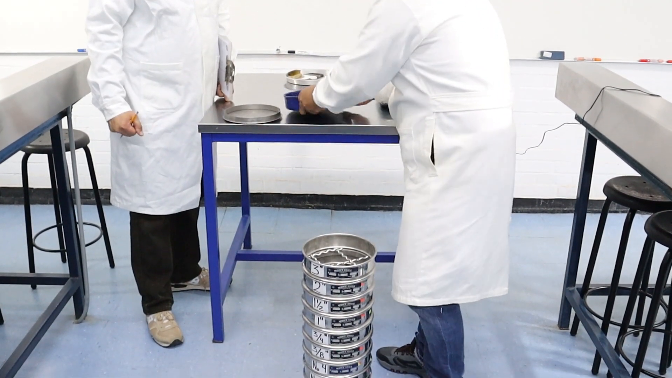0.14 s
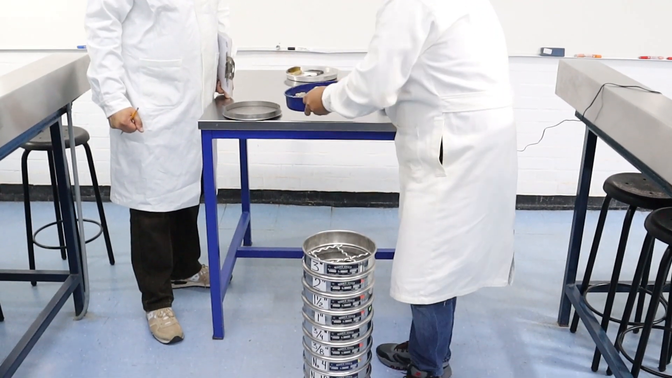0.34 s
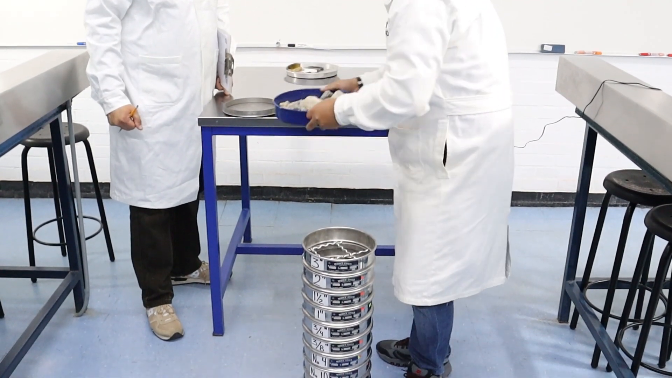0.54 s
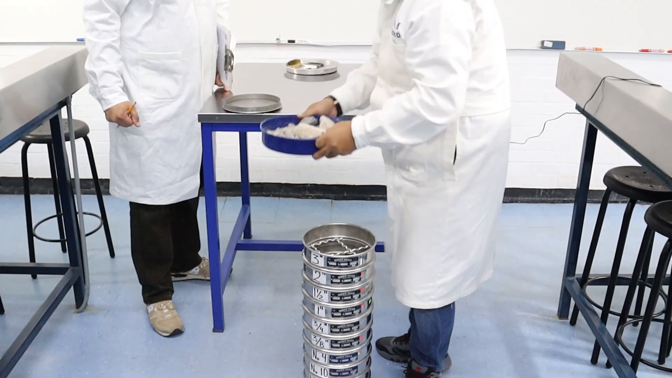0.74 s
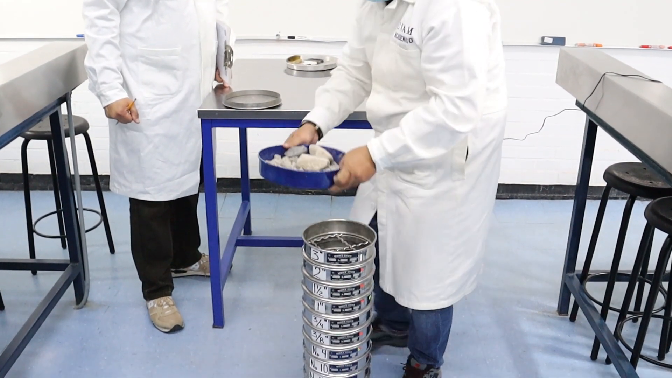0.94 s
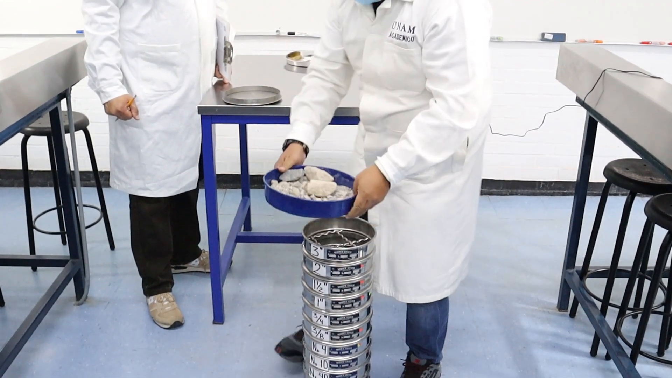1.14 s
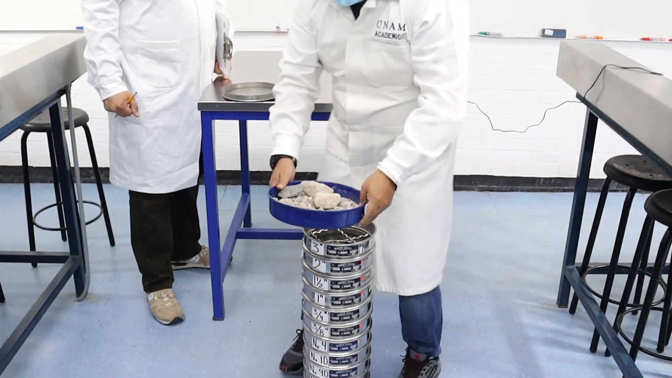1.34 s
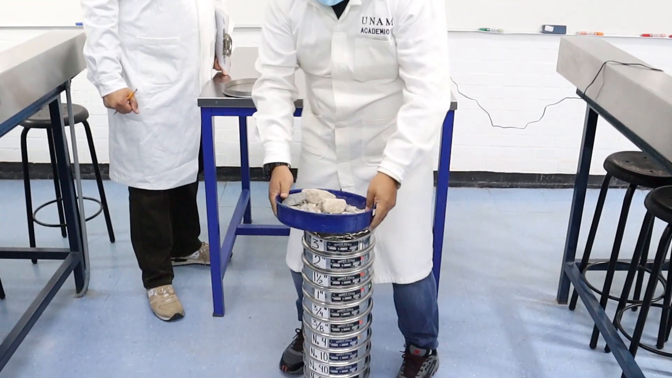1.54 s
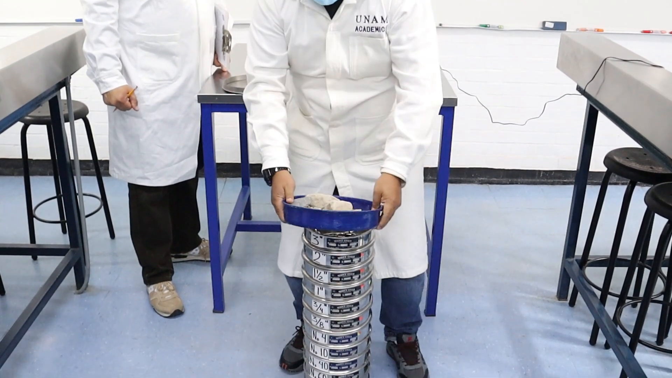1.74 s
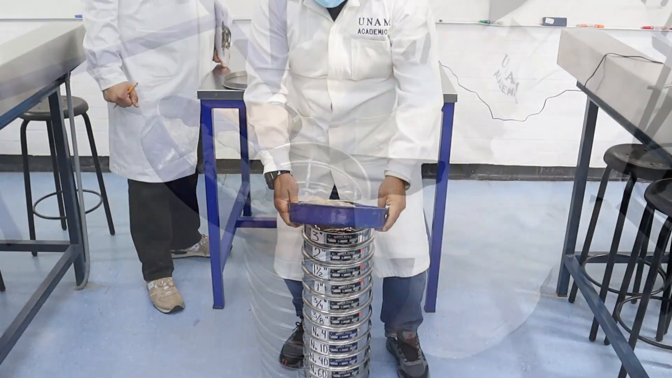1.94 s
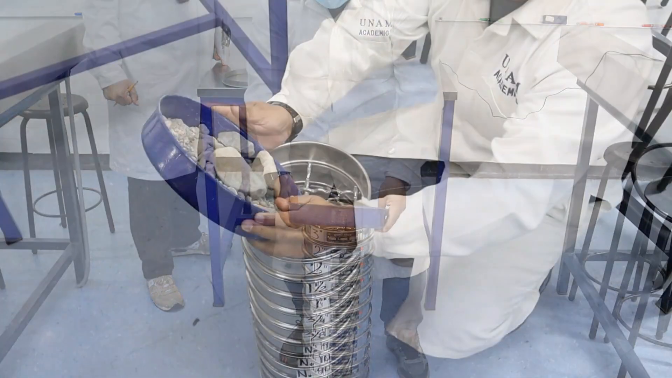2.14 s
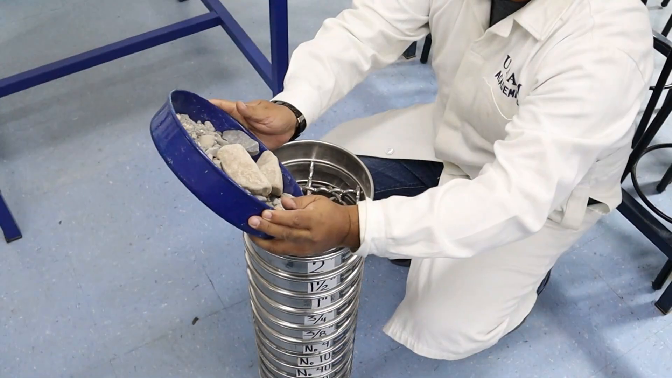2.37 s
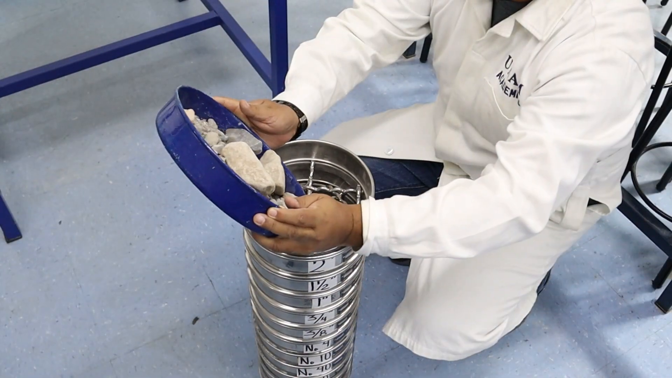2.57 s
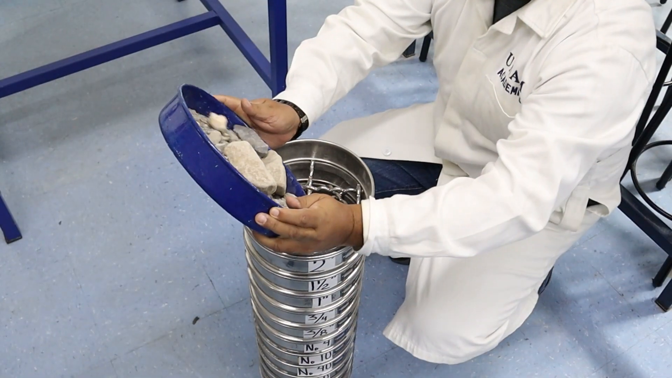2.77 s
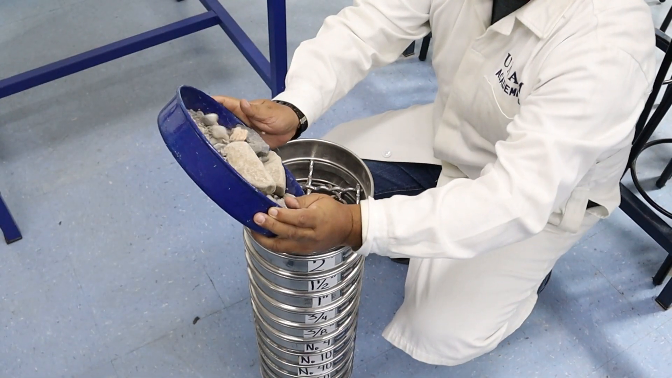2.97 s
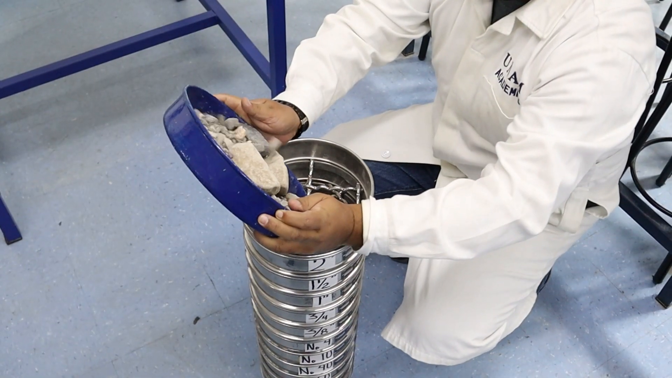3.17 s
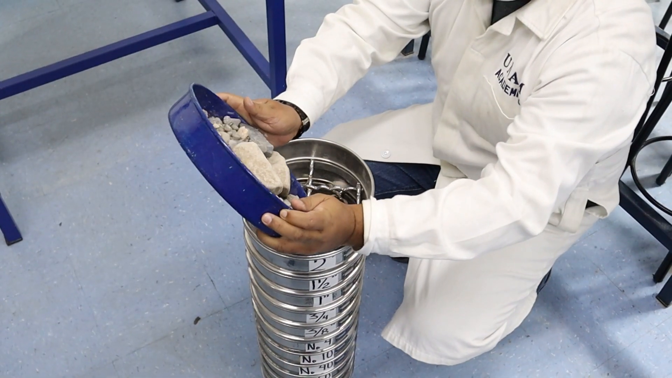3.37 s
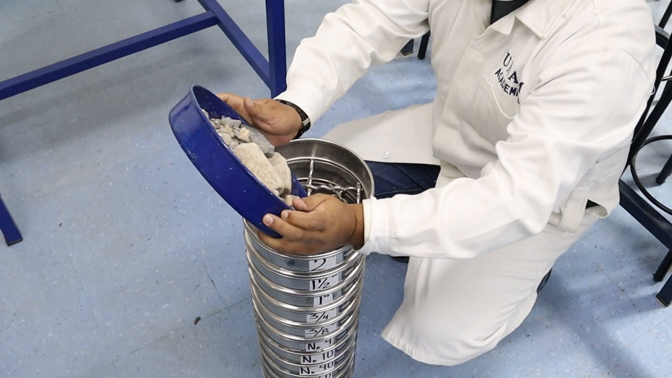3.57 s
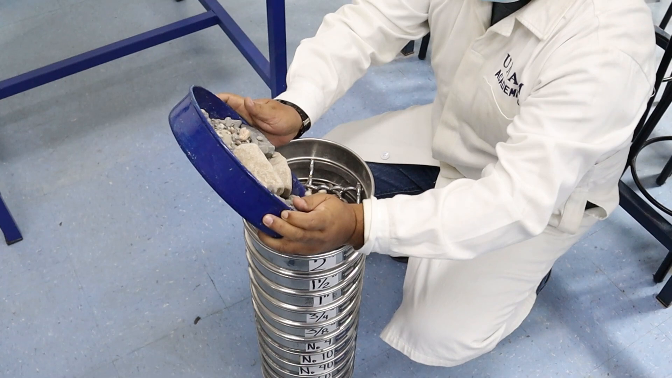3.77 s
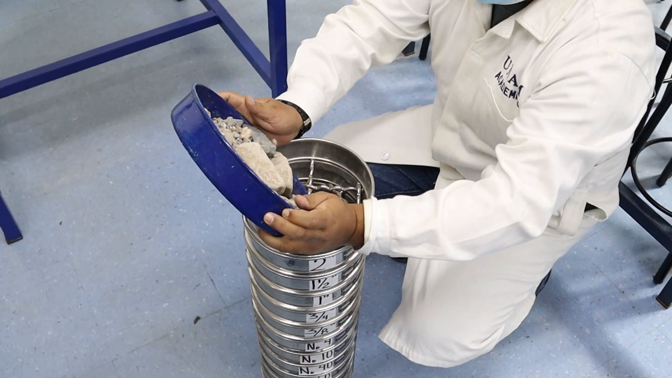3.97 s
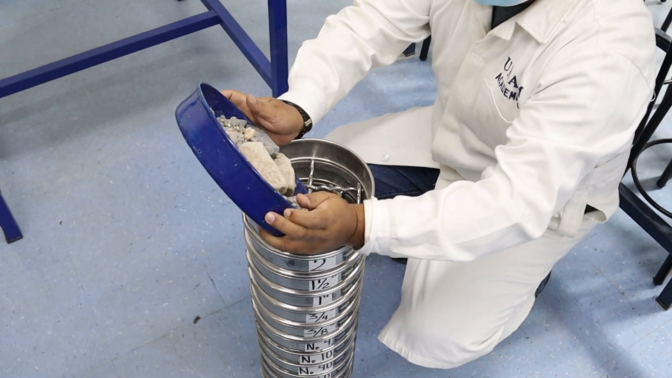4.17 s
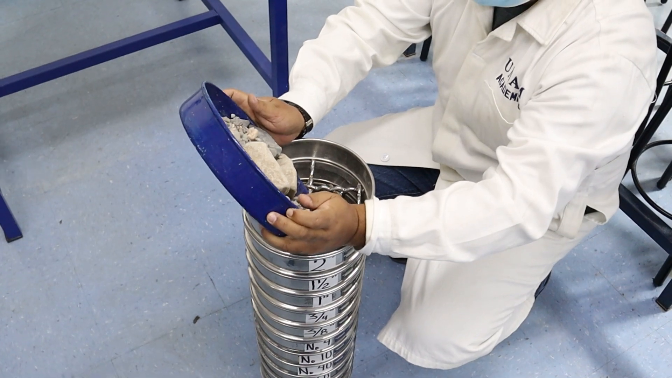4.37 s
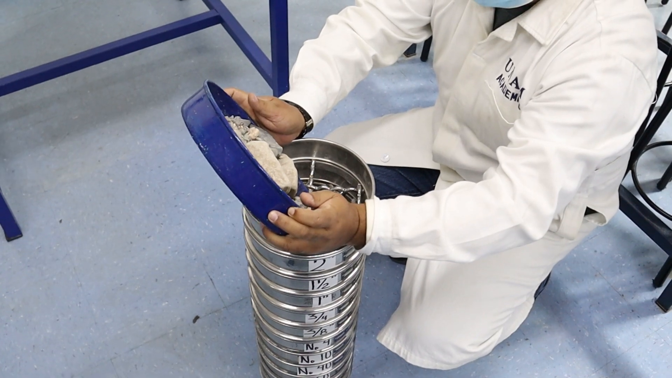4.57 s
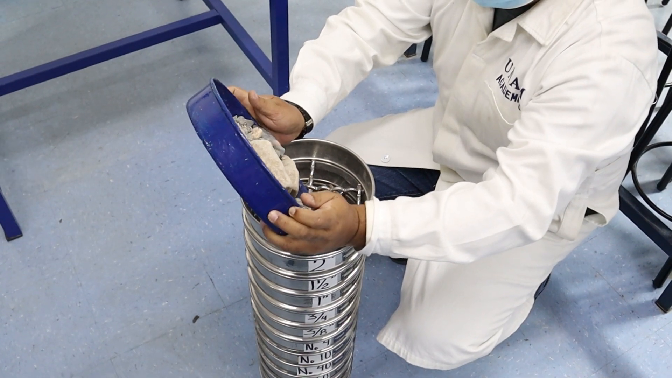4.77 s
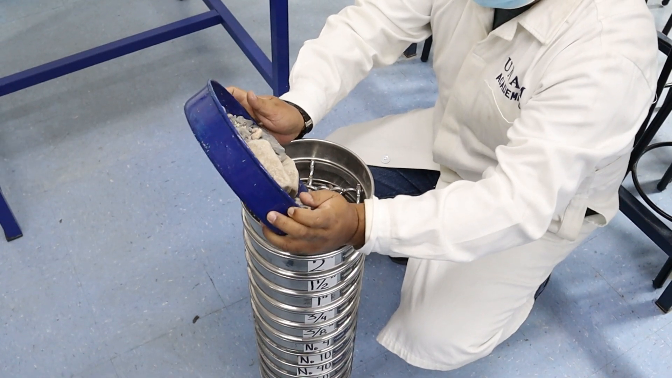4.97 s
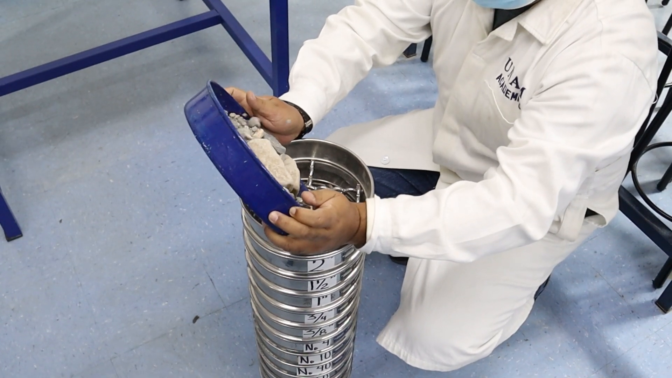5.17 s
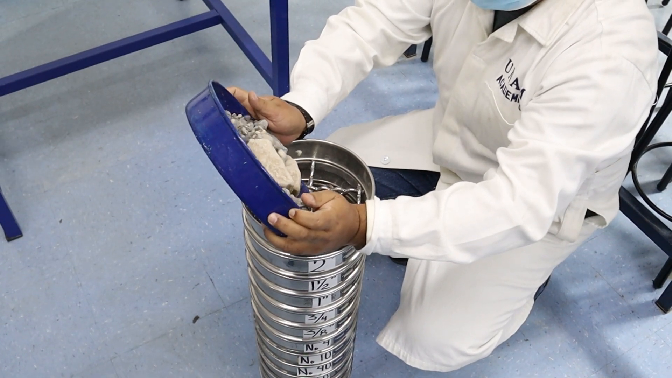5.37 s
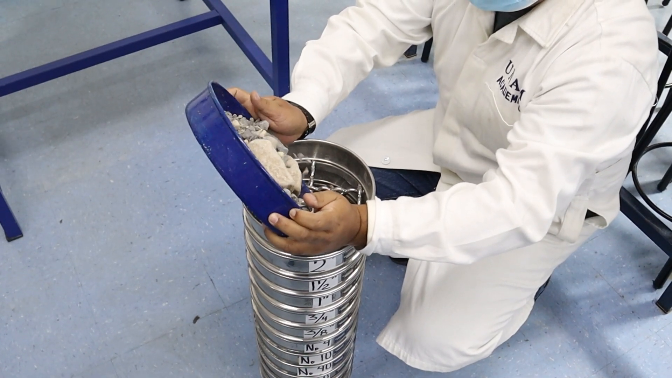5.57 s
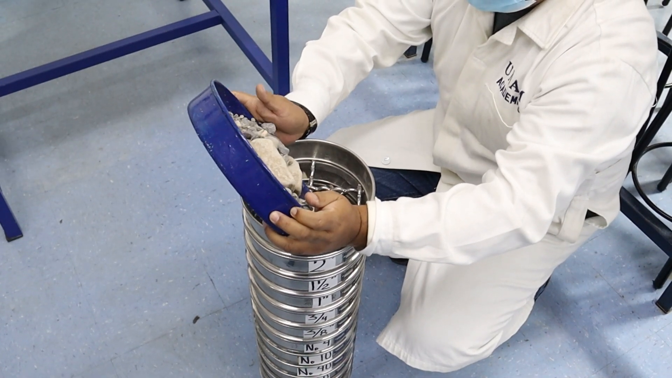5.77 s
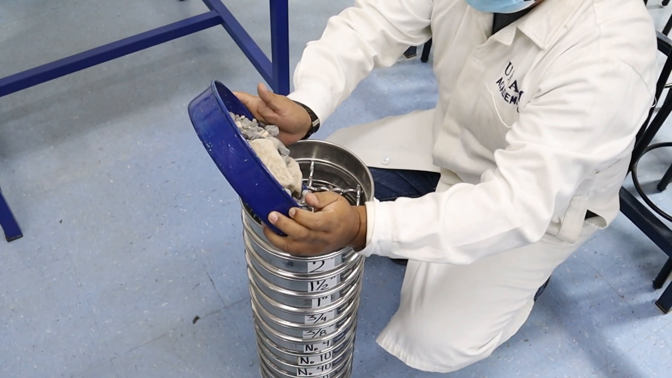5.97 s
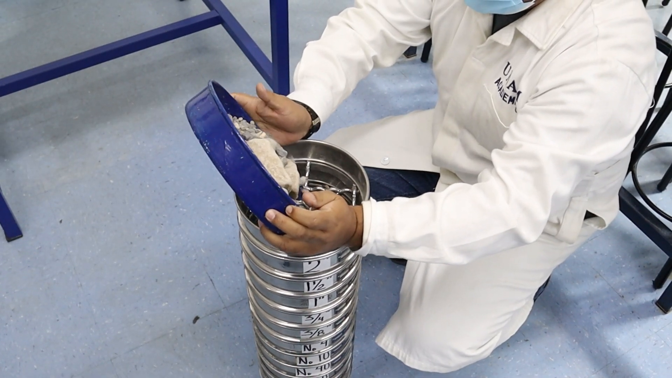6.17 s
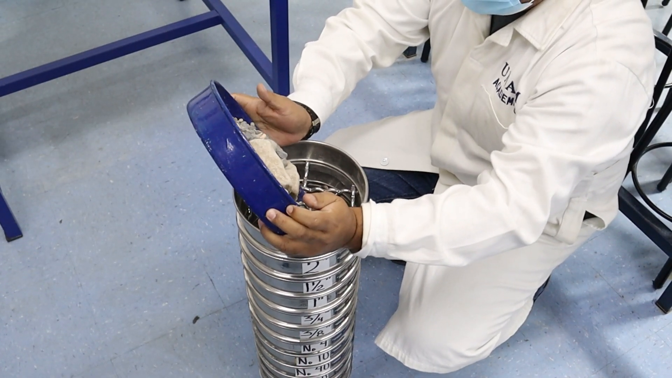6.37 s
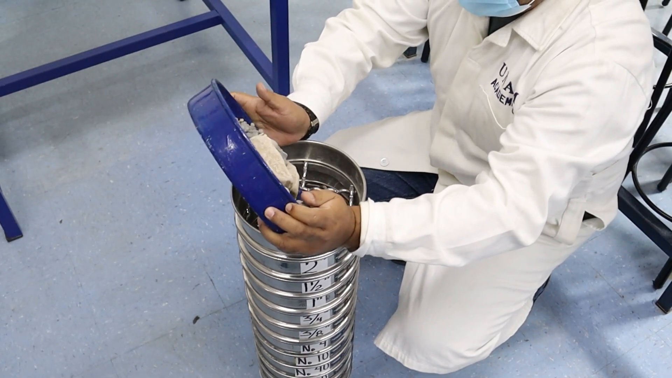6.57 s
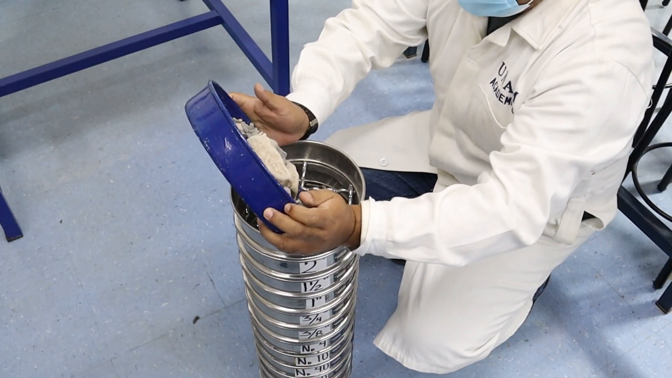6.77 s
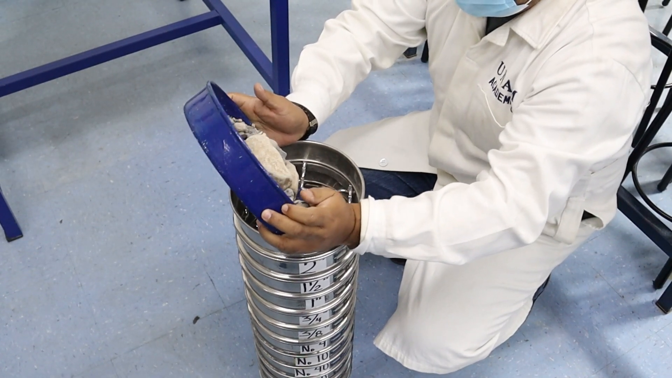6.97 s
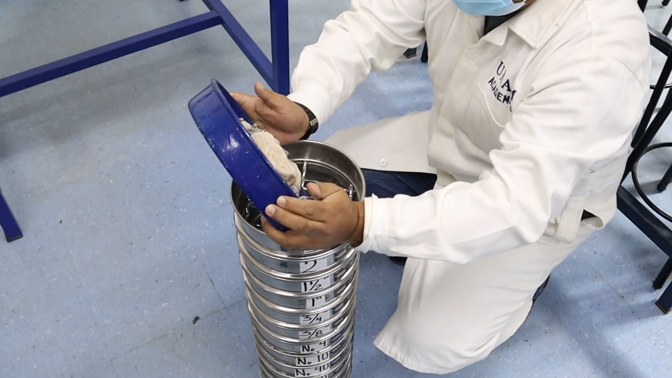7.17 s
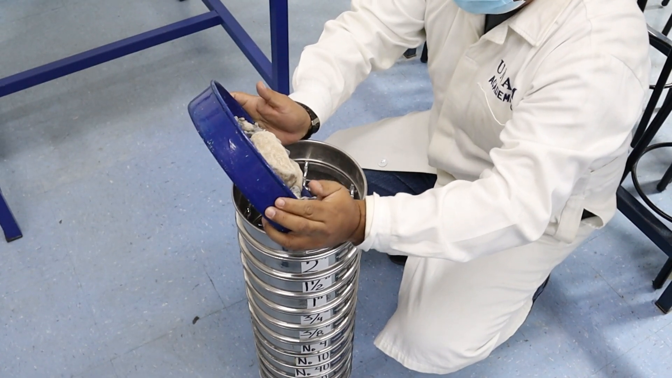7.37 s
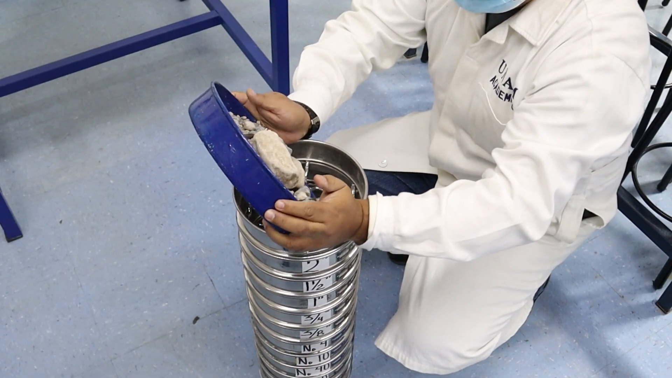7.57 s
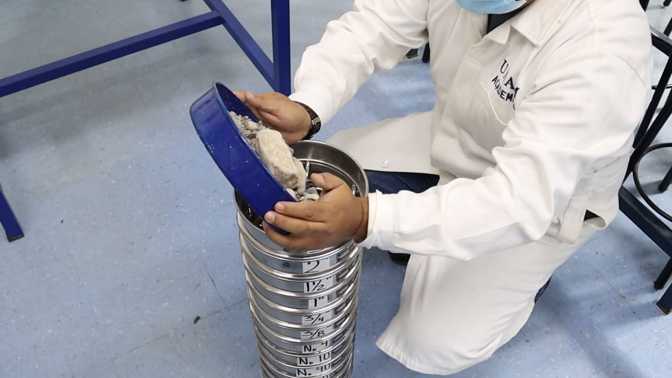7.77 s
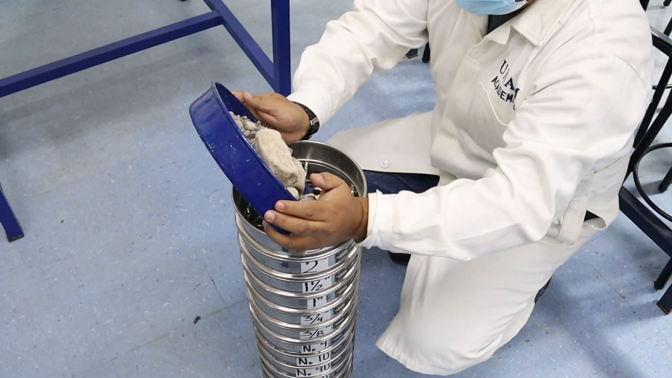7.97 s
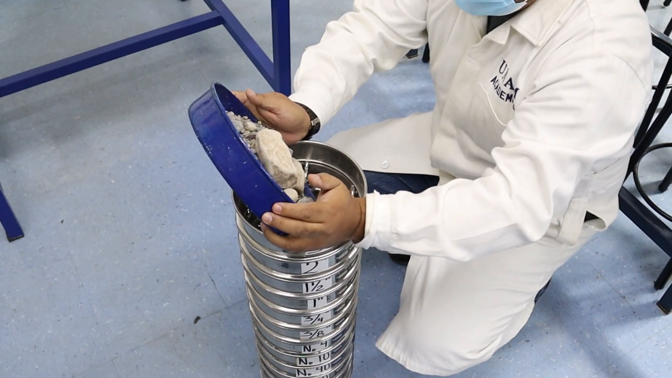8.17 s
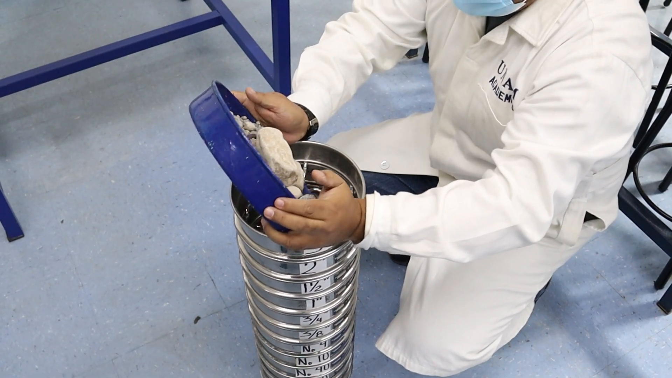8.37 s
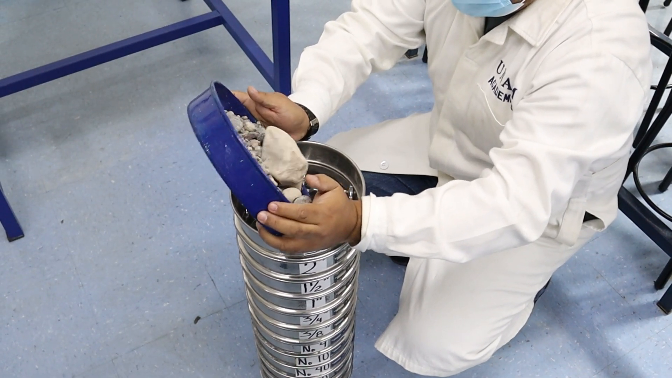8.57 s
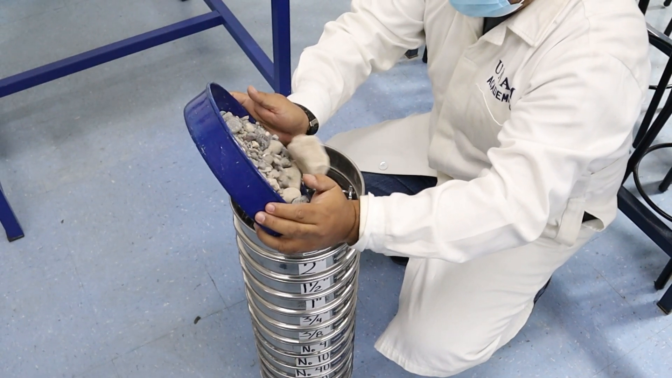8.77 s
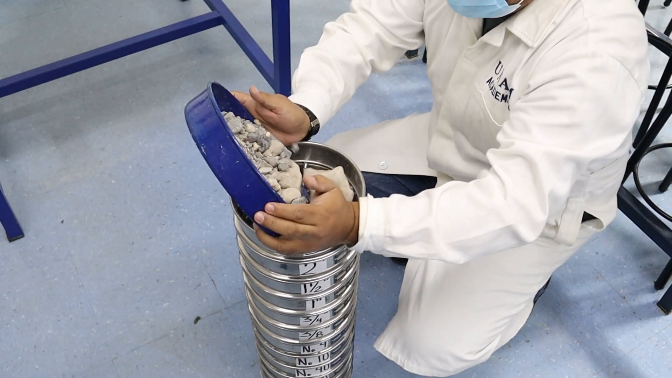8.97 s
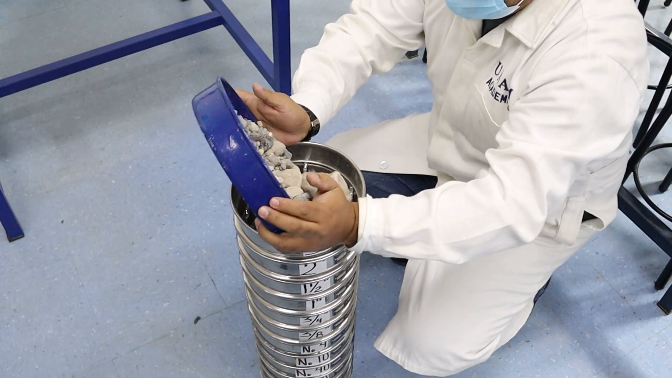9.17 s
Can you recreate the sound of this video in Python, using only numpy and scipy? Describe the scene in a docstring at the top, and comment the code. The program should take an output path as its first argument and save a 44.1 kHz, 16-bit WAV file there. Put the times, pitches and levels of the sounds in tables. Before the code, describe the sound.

Faint tray clang and shoe scuffs in a hard lab, brief silence, then close gravel cracking, sliding and hissing over steel sieve mesh, ending with a heavy stone.

```python
"""A hard-walled lab with a tall stack of steel sieves, into which a tray of gravel and sand is tipped.
Far off, a tray clang (ringing modes driven by dying noise) fades, shoes scuff (swelling filtered noise)
and small taps ring. The sound drops out briefly. Then, close up, the tray knocks the top rim, stones
crack on the wires (noise bursts and dying sines), gravel slides and sand hisses (noise that follows one
stream level), and lumps set the air column booming (resonant noise) until the largest stone lands."""
import sys
import numpy as np
from scipy import signal
from scipy.io import wavfile

SR = 44100
rng = np.random.default_rng(int(sys.argv[2]) if len(sys.argv) > 2 else 0)


def wrap_up_sound(samples):
    """Save the sound to the file named by the first command line argument, as 16-bit audio."""
    columns = np.atleast_2d(samples).T
    # keep every value between -1 and 1, then stretch to whole-number steps
    tamed = np.clip(columns, -1, 1)
    steps = np.round(tamed * 32767).astype(np.int16)
    wavfile.write(sys.argv[1], SR, steps)


N = 407043
STEP = 32   # samples per step of slow envelopes
SILENCE_START_S, SILENCE_END_S = 2.148, 2.178   # far sounds before it, close ones after


def from_db(db):
    """Decibels to gain."""
    return 10 ** (np.asarray(db) / 20)


def rms_one(x):
    """Scale to unit rms."""
    return x / np.sqrt(np.mean(x ** 2) + 1e-20)


def at_hz(points, hz):
    """Read a table on a log-frequency axis."""
    table_hz, values = np.transpose(points)
    return np.interp(np.log(hz), np.log(table_hz), values)


def band(x, low_hz, high_hz):
    """Butterworth band-pass."""
    sos = signal.butter(2, [low_hz, high_hz], "band", fs=SR, output="sos")
    return signal.sosfilt(sos, x)


def fade(clicks, t60):
    """Each click starts an envelope that dies exponentially."""
    return signal.lfilter([1], [1, -from_db(-60 / (t60 * SR))], clicks + 1e-18)


def ring(clicks, hz, t60):
    """A damped resonator: a unit click sets a sine of about height 1 ringing."""
    radius = from_db(-60 / (t60 * SR))
    angle = 2 * np.pi * hz / SR
    return signal.lfilter([0, np.sin(angle)], [1, -2 * radius * np.cos(angle), radius ** 2], clicks + 1e-18)


def pings(times, sizes, hz, t60):
    """Dying sines, each with its own time, size and pitch."""
    n = np.arange(int(.6 * t60 * SR))
    sines = np.sin(2 * np.pi / SR * hz[:, None] * n)
    waves = sizes[:, None] * from_db(-60 * n / (t60 * SR)) * sines
    at = (times * SR).astype(int)[:, None] + n
    return np.bincount(at.ravel(), waves.ravel(), N + len(n))[:N]


def placed(times, sizes):
    """Clicks of given sizes at given times."""
    clicks = np.zeros(N)
    np.add.at(clicks, np.round(np.asarray(times) * SR).astype(int), sizes)
    return clicks


def per_sample(slow):
    """A slow envelope read at every sample."""
    return np.interp(np.arange(N) / STEP, np.arange(len(slow)), slow)


def swell(start_s, rise_s, t60, hold_s=0, sag_db=0):
    """Slow envelope: rise, hold with a sag in dB per s, exponential release."""
    t = np.arange(0, N + STEP, STEP) / SR - start_s
    held = np.clip(t, 0, hold_s)
    released = np.maximum(t - hold_s - rise_s, 0)
    return np.clip(t / rise_s, 0, 1) * from_db(-sag_db * held - 60 * released / t60)


def coloured(spectrum, low_hz, octaves):
    """Steady noise in third-octave bands after a spectrum, up to the end of the silence; rms 1."""
    length = int(SILENCE_END_S * SR)
    white = rng.standard_normal((2, length))
    edges = low_hz * 2 ** np.arange(0, octaves, 1 / 3)
    noise = np.zeros(length)
    for k, (low, high) in enumerate(zip(edges, edges[1:])):
        noise += from_db(at_hz(spectrum, np.sqrt(low * high))) * band(white[k % 2], low, high)
    return np.pad(rms_one(noise), (0, N - length))


# reverberation time of the hard-walled lab: (frequency [Hz], t60 [s])
LAB_DECAY = [(300, 1), (2000, 1), (6000, 0.31), (15000, 0.29)]


def lab(x):
    """Reverberation: half-octave noise bands that each die at their own rate, after a short gap."""
    t = np.arange(SR) / SR
    edges = 250 * 2 ** np.arange(0, 6.5, .5)
    tail = np.zeros(SR)
    for low, high in zip(edges, edges[1:]):
        tail += band(rng.standard_normal(SR), low, high) * from_db(-60 * t / at_hz(LAB_DECAY, low))
    tail *= np.clip((t - .004) / 0.0051, 0, 1)
    return signal.fftconvolve(x, tail / np.sqrt(np.sum(tail ** 2)))[:N]


RUMBLE_DB = -72.5
# soft low bumps: (start [s], rise [s], t60 [s], level [dB])
LOW_BUMPS = [(0.93, .06, 0.38, -58), (2.3, 0.079, 0.35, -48.5), (2.8, 0.083, 0.23, -46.5),
             (4.93, 0.059, 0.33, -64), (5.3, 0.2, 1.5, -66), (6.35, 0.05, 0.45, -67),
             (6.57, 0.037, 0.35, -63), (7.42, 0.056, 0.42, -62), (7.7, 0.081, 0.66, -56),
             (8.1, 0.068, 0.86, -72), (8.6, 0.12, .6, -61), (8.98, 0.097, 0.67, -51)]


def bumps():
    """Low rumble: band-limited noise whose level swells into a few soft bumps."""
    level = from_db(RUMBLE_DB)
    for start_s, rise_s, t60, db in LOW_BUMPS:
        level = level + from_db(db) * swell(start_s, rise_s, t60)
    low_noise = band(band(rng.standard_normal(N), 29, 77), 39, 175)
    return per_sample(level) * rms_one(low_noise)


TICK_DB = 2.5   # tick of a tap against its body
# the quiet lab: levels of its middle, treble and low noise [dB]
ROOM_LEVELS = (-70.5, -81.5, -64)
# tail of a clang, then shoe scuffs, far off:
# (start [s], rise [s], t60 [s], middle level [dB], treble level [dB], low level [dB])
SCUFF_EVENTS = [(0.0, 0.00066, 0.87, -42.5, -59, -44.5), (0.446, 0.004, 0.38, -61, -75, -57.5),
                (0.85, 0.072, 0.56, -68.5, -73.5, -70), (1.26, .02, 0.49, -83, -86, -66),
                (1.66, 0.092, 0.5, -54, -64.5, -86), (1.825, .005, 0.45, -54.5, -83, -76)]
# colour of the middle noise: (frequency [Hz], relative density [dB per Hz])
SCUFF_SPECTRUM = [(290, -42), (500, -13.5), (1330, 0.5), (1600, -9.5), (2170, -3.5), (2870, -10.5),
                  (4440, -8.5), (6000, -16.5), (7800, -44), (13200, -120)]
# colour of the low noise: (frequency [Hz], relative density [dB per Hz])
HUM_SPECTRUM = [(41, -31), (70, 1), (93, -6), (177, -7), (222, -8), (340, -14), (630, -17.5), (700, -15),
                (910, -45), (1540, -120)]
# small distant taps: (time [s], level [dB], body [Hz], t60 [s], tick [Hz])
DISTANT_TAPS = [(0.476, -55, 800, .02, 1100), (0.5243, -38, 700, 0.0044, 1000),
                (1.274, -64, 1100, .01, 3500), (1.8305, -37, 1250, 0.0097, 4740),
                (1.84, -47, 1200, .014, 2500)]


def shuffle():
    """Far scuffs, room hiss and hum as three swelling noises, with taps of two dying sines each."""
    levels = from_db(ROOM_LEVELS)[:, None]
    for start_s, rise_s, t60, *event_db in SCUFF_EVENTS:
        levels = levels + from_db(event_db)[:, None] * swell(start_s, rise_s, t60)
    middle, treble, low = map(per_sample, levels)
    hiss = band(signal.lfilter([1], [1, -.6], rng.standard_normal(N)), 3100, 13000)
    out = middle * coloured(SCUFF_SPECTRUM, 500, 4) + treble * rms_one(hiss)
    out += low * coloured(HUM_SPECTRUM, 70, 3.4)
    for s, db, body_hz, t60, tick_hz in DISTANT_TAPS:
        out -= ring(placed([s], from_db(db)), body_hz, t60)
        out += ring(placed([s], from_db(db + TICK_DB)), tick_hz, t60)
    return out


ECHO_BLUR_S = .045   # the echo smears each tone into a narrow band
# tray against the top rim: (time [s], relative level [dB])
TRAY_KNOCKS = [(0.004, -25), (0.081, -29.5), (0.086, -32), (0.092, -39), (2.199, -25.5), (2.225, -23),
               (2.245, -52), (2.273, -12.5), (2.28, -16), (2.304, -29), (2.314, -21.5), (2.325, -37)]
# tones of the tray, levels relative:
# (frequency [Hz], level when knocked [dB], t60 [s], level in the echo of the first clang [dB])
TRAY_MODES = [(743, -24, .2, -16), (1205, -4, .09, -2), (1670, -2, .09, 0), (2077, -2, .2, -12),
              (2155, -4, .12, -12), (2595, 2, .08, -14), (2950, -2, .07, -7), (3182, -10, .1, -16),
              (3564, -16, .15, -14), (3903, -11, .1, -14), (4070, -8, .13, -14)]


def tray(level_db, clang_db, clang_s, rattle_db):
    """The metal tray rings and rattles at each knock; a clang of it is still echoing at the start."""
    s, peak_db = np.transpose(TRAY_KNOCKS)
    own = rng.standard_normal((len(s), len(TRAY_MODES)))   # every knock excites the tones differently
    echo = from_db(clang_db) * rng.standard_normal(N) * fade(placed([0], 1), clang_s)
    rattle = rng.standard_normal(N) * fade(placed(s, from_db(peak_db + rattle_db)), 0.043)
    out = band(rattle, 760, 4900)
    for k, (hz, mode_db, t60, echo_db) in enumerate(TRAY_MODES):
        sizes = from_db(peak_db + level_db + 0.68 * own[:, k])
        clicks = placed(s, sizes * np.sign(own[:, k - 1]))
        out += from_db(mode_db) * ring(clicks, hz, t60)
        out += from_db(echo_db) * ring(echo, hz, ECHO_BLUR_S)
    return band(out, 440, 9200)


SLIDE_RISE_S, SLIDE_T60_S = 0.023, 0.52
TRICKLE_DB, FULL_FLOW_DB = -50, -22.5   # full flow is the reference for all that follows the stream
# each tip of the tray lets small gravel slide: (start [s], length [s], level [dB], sag [dB per s])
GRAVEL_SLIDES = [(3.01, 0.28, -47, -8), (3.46, 0.33, -34.5, -16.5), (3.967, 0.38, -24.5, 0),
                 (4.41, 0.17, -21, 19), (4.673, 0.37, -26, 7), (5.132, 0.18, -28, 1),
                 (5.38, 0.031, -31.5, 3), (5.463, 0.11, -36, -8), (5.696, 0.62, -24.5, 4),
                 (6.363, 0.44, -24, -5), (6.955, 0.535, -21.5, 35), (7.544, 0.12, -33, 6),
                 (7.798, 0.3, -31, -13), (8.147, 0.38, -21, 5.5), (8.56, 0.27, -25.5, -10),
                 (9.008, 0.31, -30.5, -29)]


def flow():
    """Level of the gravel stream in dB: a trickle plus the slides."""
    level = from_db(TRICKLE_DB)
    for start_s, length_s, db, sag_db in GRAVEL_SLIDES:
        level = level + from_db(db) * swell(start_s, SLIDE_RISE_S, SLIDE_T60_S, length_s, sag_db)
    return per_sample(20 * np.log10(level))


SAND_DB, SAND_FOLLOWS = -42.5, 0.9   # level at full flow; dB per dB of flow


def sand():
    """Fine sand sifts through the mesh as a thin bright hiss that follows the stream."""
    hiss = rms_one(band(rng.standard_normal(N), 10000, 17700))
    return from_db(SAND_DB + SAND_FOLLOWS * (flow() - FULL_FLOW_DB)) * hiss


BOOM_DB, BOOM_FOLLOWS = -54, 0.31   # level at full flow; dB per dB of flow
THUD_DB, THUD_T60_S, THUD_OCTAVES = -7, 0.063, 0.89   # the knock of a lump, and its reach in pitch
BOOM_TAIL_DB, BOOM_TAIL_S = -7, 1   # the weaker boom after the knock: level against it, t60
# air column of the stack: (frequency [Hz], width [Hz], relative level [dB])
AIR_COLUMN = [(127, 86, -11), (185.5, 40, 2.5), (231, 31, 2.5), (353, 38, 3), (445, 32, -3.5),
              (593, 63, 3.5), (853, 140, 0)]
# big lumps land in the stack: (time [s], relative level [dB], frequency favoured [Hz])
LUMP_THUDS = [(2.858, -46, 600), (2.92, -50, 700), (2.973, -47, 403), (3.063, -42.5, 620),
              (3.082, -62, 705), (3.14, -69, 604), (3.299, -46, 220), (3.448, -39, 410), (3.743, -37, 485),
              (3.984, -51, 356), (4.045, -47, 900), (4.12, -51, 900), (4.88, -50, 250.3), (6.389, -45, 350),
              (6.66, -40, 298.7), (6.749, -38, 196), (6.988, -45, 324), (7.081, -36, 303),
              (7.339, -56.5, 343), (7.606, -50, 395), (7.714, -35, 197), (7.99, -43, 602),
              (8.156, -39, 448), (8.23, -36, 220.9), (8.349, -41, 305), (8.881, -28.5, 498),
              (8.994, -24.5, 270), (9.125, -28, 757)]


def boom():
    """Noise through the air column's resonances, driven by the stream; lumps favour those near their pitch."""
    white = rng.standard_normal(N)
    steady = from_db(BOOM_DB + BOOM_FOLLOWS * (flow() - FULL_FLOW_DB))
    s, peak_db, thud_hz = np.transpose(LUMP_THUDS)
    all_modes, out = np.zeros(N), np.zeros(N)
    for k, (hz, width_hz, mode_db) in enumerate(AIR_COLUMN):
        t60 = np.log(1000) / np.pi / width_hz
        mode = (-1) ** k * from_db(mode_db) * ring(white, hz, t60) * np.sqrt(width_hz)
        near = np.exp(-(np.log2(thud_hz / hz) / THUD_OCTAVES) ** 2)
        thuds = placed(s, near * from_db(peak_db + THUD_DB))
        knock = fade(thuds, THUD_T60_S)
        tail = from_db(BOOM_TAIL_DB) * fade(thuds, BOOM_TAIL_S)
        out += mode * (steady + knock + tail)
        all_modes += mode
    return out / np.std(all_modes)


RING_T60_S, RING_SHORTENS = .26, .5   # t60 at 1 kHz; power of pitch by which it shortens
RING_ROUGH, RING_WAVER_HZ = .9, 60   # gravel on the rim makes a ring waver: depth, upper rate
SNAP_CYCLES = 6.9   # t60 of a snap in cycles
# a stone sets one rim or the air column singing alone: (time [s], level [dB], frequency [Hz])
LONE_RINGS = [(3.448, -26, 2720), (3.52, -34.5, 1268), (3.885, -42, 1002), (3.984, -45.5, 367),
              (4.044, -31.5, 2114), (4.118, -37, 996), (4.761, -41, 1150), (5.143, -32.5, 3140),
              (5.4, -30, 2093), (6.147, -43, 1224), (6.366, -44, 359), (7.127, -36, 1174),
              (8.15, -28, 1468), (8.563, -30, 3120), (8.61, -35, 2072), (8.996, -35.5, 192.8),
              (9.124, -35, 625)]
# stone on stone, short and dry: (time [s], level before the band-pass [dB], frequency [Hz])
DRY_SNAPS = [(2.4972, -26, 4160), (2.6203, -27, 6110), (2.7165, -28, 5540), (2.7475, -25, 3670),
             (2.911, -30, 4850), (2.9733, -10, 3880), (3.1954, -11, 6380), (3.221, -15, 5000),
             (4.5698, -7, 8750), (5.763, -9, 8200), (6.568, -10, 4300), (6.7862, -8, 4300),
             (7.0816, -11, 5800), (8.2015, -4, 5700), (8.6122, -6, 5900)]


def singles():
    """Lone rings that outlast their blow, and dry snaps of a few cycles, all dying sines."""
    def played(rows, t60):
        """One dying sine a row."""
        return sum(pings(np.array([s]), from_db([db]), np.array([hz]), t60(hz)) for s, db, hz in rows)

    waver = 1 + RING_ROUGH * rms_one(band(rng.standard_normal(N), 11.7, RING_WAVER_HZ))
    rings = played(LONE_RINGS, lambda hz: RING_T60_S * (1000 / hz) ** RING_SHORTENS)
    snaps = played(DRY_SNAPS, lambda hz: SNAP_CYCLES / hz)
    return waver * rings + band(snaps, 950, 15000)


# the largest stone lands and rocks: (time [s], relative level [dB])
BIG_STONE_KNOCKS = [(8.9897, -13), (8.9924, -13), (8.994, -7.5), (8.9986, -8.5), (9.0038, -18),
                    (9.0113, -21)]
# its tones: (frequency [Hz], relative level [dB], t60 [s])
BIG_STONE_TONES = [(720, -15, .025), (1163, -10, .018), (1604, -3, .015), (2094, -5, .02), (2600, -6, .012),
                   (3400, -6, .012), (4400, -11, .008)]


def big_stone():
    """Tight knocks: clicks through heavily damped resonators."""
    s, peak_db = np.transpose(BIG_STONE_KNOCKS)
    clicks = placed(s, from_db(peak_db))
    return sum((-1) ** k * from_db(db) * ring(clicks, hz, t60)
               for k, (hz, db, t60) in enumerate(BIG_STONE_TONES))


GRIT_PER_S, GRIT_T60_S, GRIT_SHARE = 450, 0.0088, 0.23   # fine ticks within the rustle


def grit():
    """Gain that breaks a rustle into uneven ticks; rms 1."""
    ticks = (rng.random(N) < GRIT_PER_S / SR) * rng.exponential(1, N)
    return rms_one(1 - GRIT_SHARE + GRIT_SHARE * rms_one(fade(ticks, GRIT_T60_S)))


CRACK_DB, BARE_DB = -7, 23   # first crack against the ringing; how much sharper on bare wires
BARE_DULL_DB = 28   # per octave above 9 kHz, taken off that extra sharpness
COVERED_S, COVERING_S = 3.76, 0.33   # time when gravel has covered the wires; how long that takes
BRIGHT_DB, BRIGHT_FOLLOWS = 0.5, 0.17   # tilt of the stream at full flow; dB per dB of flow
RATE_FOLLOWS = .25   # a thin stream has fewer pebbles: dB of rate per dB of flow
# stones on the mesh: (time [s], relative level [dB], heaviness: low end against the middle [dB],
# hardness: high end against the middle [dB]); low end 1.4 kHz, middle 4.2 kHz, high end 10 kHz
STONE_BLOWS = [(2.2462, -42, -30, -7), (2.31, -49, -30, -4), (2.326, -39, -30, -3), (2.356, -39, -30, -1),
               (2.3904, -41, -30, -2), (2.409, -47, -30, 1), (2.4188, -42, -35, 5), (2.491, -35, -30, -5),
               (2.498, -24, -10, -15), (2.537, -33.5, -34, 1), (2.559, -49, -30, 1), (2.5855, -39, -27, 6),
               (2.62, -25.5, -31, -5), (2.6882, -40, -30, 0), (2.716, -34, -15, -5), (2.748, -41, 6, -11),
               (2.7645, -47, -30, 4), (2.7941, -34, -23, -1), (2.819, -47, -23, -4), (2.8883, -42, -23, 0),
               (2.912, -40, 3, -1), (2.9287, -41, -24, 3), (2.939, -34, -22, -6), (2.947, -40, -23, 5),
               (2.974, -26, -5, -10), (3.0027, -37, -32, 6), (3.01, -28, -28, -1), (3.018, -33, -28, -7),
               (3.0357, -38, -12, -6), (3.0545, -30, 2, 3), (3.1, -31, -21, 1), (3.117, -30, -6, -7),
               (3.149, -49, -10, -2), (3.1655, -15.5, -7, -13), (3.1951, -20, 3.5, -2),
               (3.2202, -20, 0, -9), (3.257, -27, -4, -16), (3.321, -27, 1, -10), (3.36, -29, -2, 1),
               (3.386, -35, -11, 3), (3.393, -27, 3, -4), (3.419, -25, -21, -4), (3.436, -25, -6, -8),
               (3.4473, -6.5, -5, 4), (3.4824, -20.5, -26, 10.5), (3.5194, -15, -5, 3), (3.5397, -7, -8, 3),
               (3.655, -14, -37, -8), (3.6737, -5.5, -11.5, -3.5), (3.743, -5.5, -9.5, -3.5),
               (3.823, -20, -25.5, -8), (3.885, -12, -6, -14), (3.917, -32, -8, -15),
               (3.929, -25.5, 4, -14), (3.9445, -0.5, -14, -3.5), (3.9855, -5.5, -12, -6),
               (4.016, -18, -4, 11), (4.043, -6, -10, -1), (4.086, -27, -17, -8), (4.1087, -21, -11, -8),
               (4.1392, -8, -20, -1), (4.205, 2.5, -53, -9.5), (4.251, -11, -7, 4), (4.267, -8.5, -7, -1),
               (4.2858, -6.5, -38, -2), (4.338, -20, -25, 9), (4.3566, -21, -19, -8), (4.406, -9, -28, -4),
               (4.4161, -8.5, -13, -4), (4.483, -12, -21, 0), (4.508, -11.5, -23, 3),
               (4.539, -8.5, -17, -16), (4.5692, -11, -21, 12), (4.584, -8.5, -16, -3),
               (4.614, -18, -27, 2), (4.625, -17, -28, 5), (4.6757, -7.5, -19, -6.5), (4.761, -9.5, -10, 2),
               (4.8082, -17, -24, -6), (4.8214, -12, -23, 1), (4.8341, -13.5, -18, -3), (4.882, -12, -9, 2),
               (4.903, -15, -18, -1), (4.9456, -18, -22, 4), (5.0083, -12, -20, -4),
               (5.029, -16.5, -26, 4.5), (5.061, -32, -31, 9), (5.0954, -21, -22, 3),
               (5.119, -7.5, -28, -3), (5.143, -4.5, -18, -5), (5.167, -18, -13, 8), (5.1783, -12.5, -3, 1),
               (5.2502, -8.5, -32, -3), (5.2736, -12.5, -48, -6), (5.4, -11.5, -3, 5),
               (5.481, -15.5, -39, 6), (5.4985, -29, -20, -8), (5.545, -25.5, -17, 3),
               (5.5634, -16.5, -14, -2), (5.5836, -17, -17, 2), (5.592, -9, -12, -6),
               (5.6302, -19.5, -15, 6.5), (5.7079, -12.5, -11, 0), (5.7304, -11.5, -15, 6),
               (5.748, -14, -12, 4.5), (5.763, -21, -17, 0), (5.778, -22, -25, -1), (5.802, -15, -17, 5),
               (5.826, -20.5, -20, 5), (5.844, -23, -18, 1), (5.875, -14, -10, -2), (5.901, -14.5, -27, 3),
               (5.9316, -15, -22.5, -17), (5.961, -12, -8, -2.5), (5.982, -13, -9, 3.5),
               (6.0243, -19, -28, 5), (6.049, -18, -30, 1.5), (6.0642, -18, -27, -2),
               (6.0851, -27, -24, 10), (6.1094, -11.5, -9, -2), (6.126, -17, -24, 0),
               (6.1468, -11.5, -17, 5), (6.158, -15, -20, -3), (6.1978, -10, -20, -2), (6.249, -18, -21, 5),
               (6.263, -13.5, -10, -1), (6.2843, -19, -12, 1), (6.351, -10, -15, -6), (6.3639, 0, -11, -10),
               (6.3928, -10, -34, -2), (6.4347, -18, -22, -4.5), (6.452, -6.5, -8, 2), (6.498, -12, -11, 1),
               (6.523, -8.5, -7, -7), (6.541, -12, -17, 1), (6.567, -6.5, -19, -14), (6.607, -8, -13, -2),
               (6.6245, -3, -19.5, -17), (6.651, -11.5, -8, -2), (6.689, -13.5, -6, -8),
               (6.7019, -13, -18, 2), (6.731, -14, -11, 4), (6.7855, 0, -11.5, -5), (6.9485, -4, -11, -7.5),
               (6.9875, -12, -16, 1), (7.0403, -17.5, -37, 7), (7.081, -8, -2, -3), (7.1267, -14.5, 1, 9),
               (7.155, -20, -25, 0), (7.1996, -11.5, -28, -2), (7.2465, -25, -21, -7),
               (7.284, -17.5, -29, 6.5), (7.295, -18.5, -24, 0), (7.336, -22, -17, 4), (7.356, -14, -19, 3),
               (7.37, -19, -28, 9), (7.4257, -18, -33, -5), (7.4884, -28, -16, 3), (7.4998, -18.5, -19, 0),
               (7.549, -21.5, -27, 6), (7.575, -13, -12, 2), (7.6336, -41, -17, 1), (7.6466, -36, -26, 10),
               (7.7914, -5.5, -17, -5), (7.822, -12.5, -22.5, -3.5), (7.8526, -20, -8, 6),
               (7.8756, -11.5, -36, -4), (7.9463, -10.5, -3, 1), (7.96, -25, -16, -5), (7.99, -22.5, 8, -8),
               (8.0227, -17.5, -22, 8), (8.039, -19, -22, 1.5), (8.0717, -15, -22, -7),
               (8.0848, -5.5, -5, 1), (8.118, -7.5, -3.5, -1), (8.151, -11, 1.5, 4),
               (8.166, -3.5, -14, -17), (8.2004, 1.5, -26, -2), (8.213, -7.5, -3, -18),
               (8.2547, -12.5, -24, -12), (8.2738, -5, -26, -8), (8.2835, -21, 9, -4),
               (8.3473, -11.5, -9, 2), (8.368, -8, -3, -19.5), (8.388, -10.5, -13, -2),
               (8.413, -15, -12, -5), (8.444, -4.5, -5, -5), (8.4882, -10.5, -7.5, 0),
               (8.5624, -2, -8.5, -8), (8.61, -4.5, -5, -4), (8.6821, -15, -12, -2), (8.694, -25, -18, -7),
               (8.7266, -2.5, -15, -6.5), (8.7712, -10, -20, -2), (8.8044, -11.5, -1, -7),
               (8.854, -10.5, -6.5, -7), (8.882, -21, -11.5, -0.5), (8.959, -9.5, -6, 2.5),
               (8.969, -14, -14, -2), (8.9923, -1, 0, -7), (9.051, -22, 8, -15), (9.1023, -14, -8, 0),
               (9.1588, -20, -25.5, -8), (9.183, -15.5, -15, 2), (9.21, -14, -24, -2)]
# colour of the gravel: (frequency [Hz], relative density [dB per Hz])
GRAVEL_SPECTRUM = [(260, -45), (450, -14), (616, -16.5), (908, -10.5), (1530, -2), (1860, 0), (2330, 0),
                   (2620, -1), (4300, 2.5), (8290, 5.5), (15100, -5.5), (16000, -20)]
# how long the wires rustle: (frequency [Hz], t60 [s])
MESH_DECAY = [(500, 0.15), (1500, 0.15), (4000, 0.11), (8000, 0.082), (11000, 0.029), (16000, 0.04)]
# rims of the sieves, rung by blows: (frequency [Hz], level against the blow [dB], t60 [s])
SIEVE_RIMS = [(1001, -21, 0.14), (1475, -18, 0.1), (1981, -22, .1), (2107, -17, 0.082), (2604, -24, 0.07),
              (3023, -24, 0.092), (3154, -22, .07), (4436, -20, 0.043), (5942, -21, 0.04)]


def mesh(pebbles_per_s, spread_db, pebble_db, colour_db, stone_db, wire_db, wire_spread_db, wire_tilt,
         sustain, contact_s):
    """A blow is a crack, a rustle of countless wire modes dying band by band, and a few wires that sing out."""
    s, peak_db, heavy_db, hard_db = np.transpose(STONE_BLOWS)
    level_db = flow()
    over_full_db = level_db - FULL_FLOW_DB
    bright_db = BRIGHT_DB + BRIGHT_FOLLOWS * over_full_db
    bare = np.clip((COVERED_S - s) / COVERING_S, 0, 1)
    edges = 450 * 2 ** np.arange(0, 5.3, 1 / 3)
    own = rng.standard_normal((len(s), len(edges), 4))     # every stone favours other wires

    pebble_rate = pebbles_per_s * from_db(RATE_FOLLOWS * over_full_db)
    born = np.flatnonzero(rng.random(N) < pebble_rate / SR)
    size_db = spread_db * np.minimum(rng.exponential(1, len(born)), 2.5)
    tick_db = rng.normal(1.1, 3.7, len(born))     # pebbles range from dull to crisp
    times = np.concatenate([s, born / SR])

    rise = np.exp(-1 / (contact_s * SR))
    white, grain, out = rng.standard_normal((2, N)), grit(), np.zeros(N)
    for k, (low, high) in enumerate(zip(edges, edges[1:])):
        hz = np.sqrt(low * high)
        place = np.interp(np.log(hz), np.log([1400, 4200, 10000]), [-1, 0, 1])
        gravel_db = at_hz(GRAVEL_SPECTRUM, hz)

        lean_db = max(-place, 0) * heavy_db + max(place, 0) * hard_db
        if hz < 1400:
            lean_db += gravel_db - at_hz(GRAVEL_SPECTRUM, 1400)
        stream_db = level_db[born] + place * bright_db[born] + gravel_db
        blow_db = np.concatenate([peak_db + stone_db + lean_db, stream_db + pebble_db + size_db])

        # columns: rustle level, whether a wire sings, wire level, wire pitch
        chance = np.concatenate([own[:, k], rng.standard_normal((len(born), 4))])
        chance = np.clip(chance, -2, 1.6)
        blows = from_db(blow_db + colour_db * chance[:, 0])

        crack_db = CRACK_DB + bare * (BARE_DB - BARE_DULL_DB * max(np.log2(hz / 9000), 0))
        sharp_db = np.concatenate([crack_db, tick_db]) - 3.1 * max(place, 0)
        cracks = placed(times, from_db(blow_db + sharp_db))

        t60 = at_hz(MESH_DECAY, hz)
        rustle = fade(placed(times, blows), t60)
        rustle = signal.lfilter([1 - rise], [1, -rise], rustle)  # ringing takes a moment to build
        sound = white[k % 2] * (grain * rustle + fade(cracks, 0.0046))

        sing = chance[:, 1] > .7     # some blows meet a wire of their own pitch in this band
        strength = blows * from_db(wire_db + wire_spread_db * chance[:, 2]) * (hz / 4000) ** wire_tilt
        wire_hz = hz * (high / low) ** (chance[:, 3] / 4)
        sound += pings(times[sing], strength[sing], wire_hz[sing], sustain * t60)

        for rim_hz, rim_db, rim_t60 in SIEVE_RIMS:
            if low <= rim_hz < high:
                rim_clicks = placed(times, blows * from_db(rim_db) * chance[:, 3])
                sound += ring(rim_clicks, rim_hz, rim_t60)
        out += band(sound, low, high)
    return out


def scene():
    """The distant lab first, the close pour from the silence on."""
    close = np.arange(N) / SR > SILENCE_START_S
    steel = close * mesh(pebbles_per_s=150.0, spread_db=4.0, pebble_db=-20.0, colour_db=4.0, stone_db=-10.0,
                         wire_db=-9.5, wire_spread_db=2.5, wire_tilt=0.01, sustain=0.66, contact_s=.0006)
    steel += big_stone() + singles()
    steel += tray(level_db=-23.0, clang_db=-71.0, clang_s=1.0, rattle_db=-4.5)
    echoes = from_db(-10.5) * lab(steel)
    near = close * (boom() + sand())
    far = ~close * shuffle()
    return (steel + echoes + near + bumps() + far)[None]


CUTOFF_HZ = 16200


def record(dry):
    """Peaks are rounded, the sound falls silent for a moment and the top is cut."""
    t = np.arange(N) / SR
    outside_s = np.maximum(SILENCE_START_S - t, t - SILENCE_END_S)
    open_gain = np.clip(outside_s / .002, 0, 1)
    rounded = .95 * np.tanh(dry / .95)
    top_cut = signal.cheby2(12, 50, CUTOFF_HZ, fs=SR, output="sos")
    return signal.sosfilt(top_cut, rounded * open_gain)


dry = scene()
out = record(dry)
wrap_up_sound(out)
```